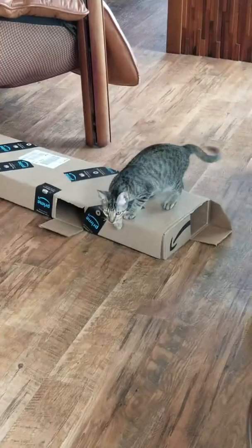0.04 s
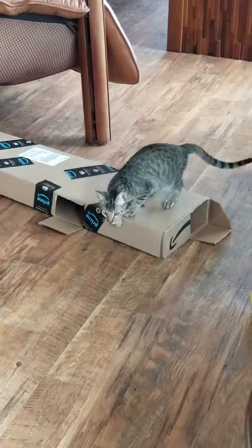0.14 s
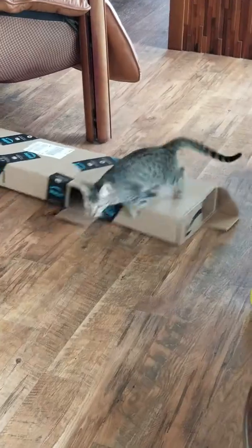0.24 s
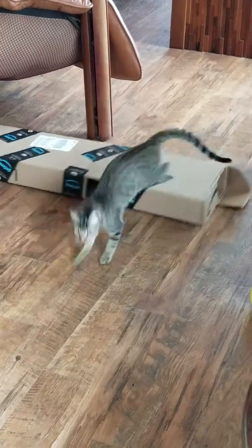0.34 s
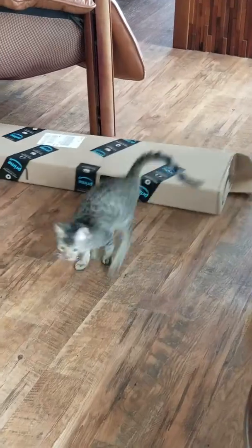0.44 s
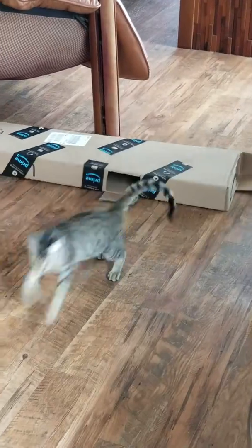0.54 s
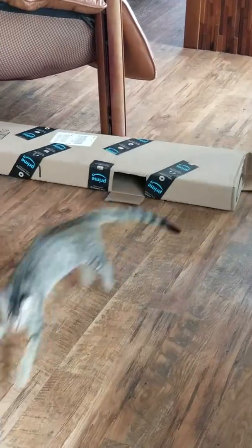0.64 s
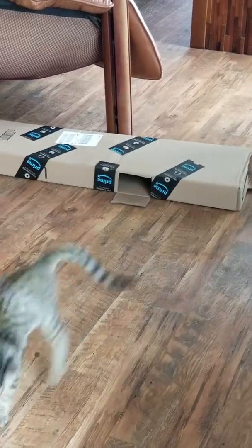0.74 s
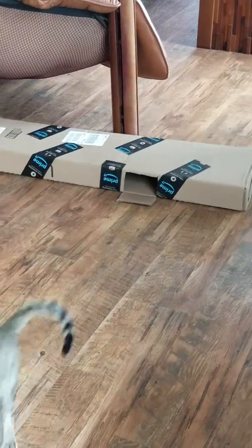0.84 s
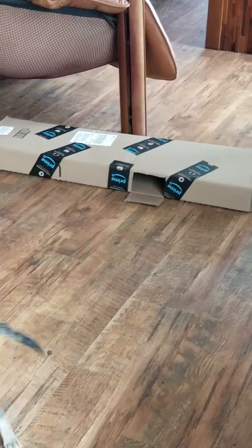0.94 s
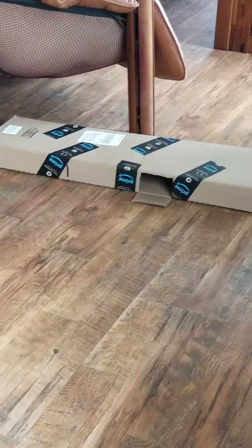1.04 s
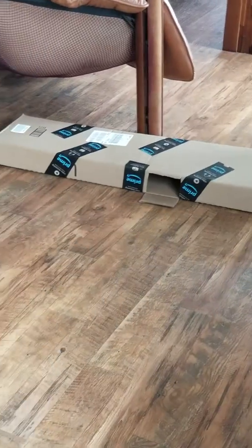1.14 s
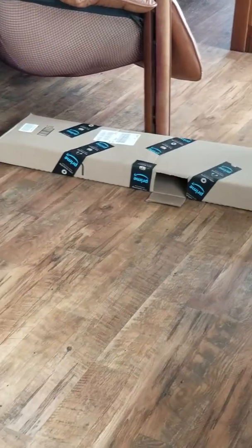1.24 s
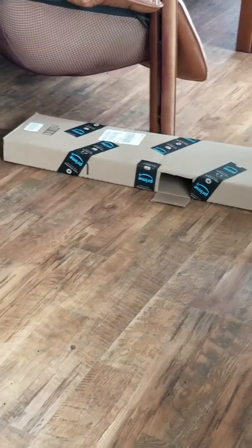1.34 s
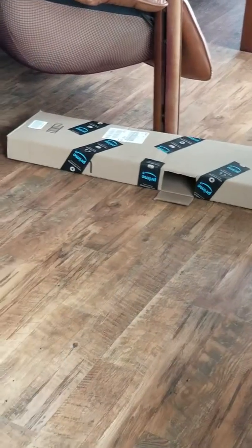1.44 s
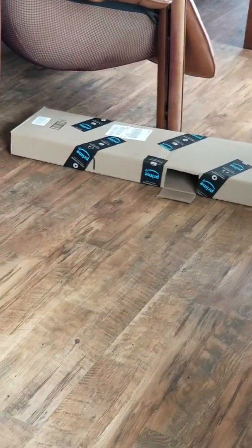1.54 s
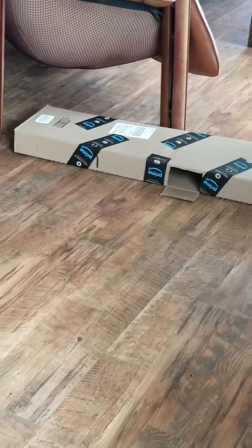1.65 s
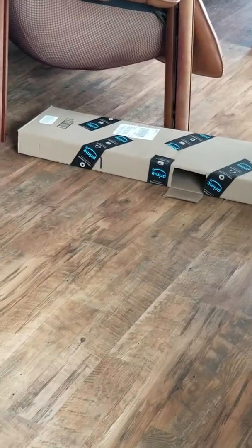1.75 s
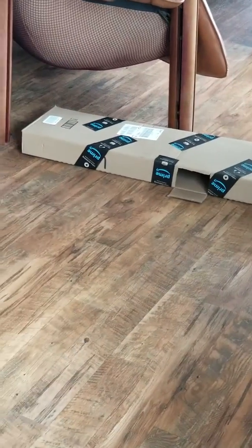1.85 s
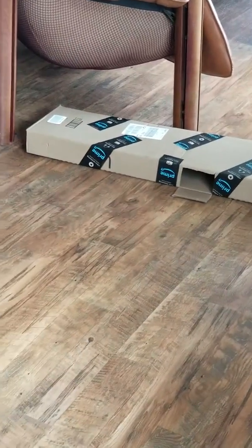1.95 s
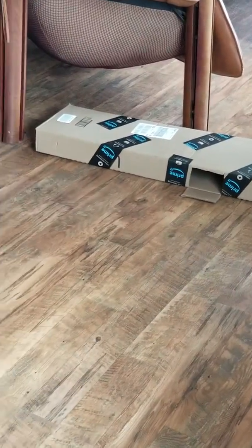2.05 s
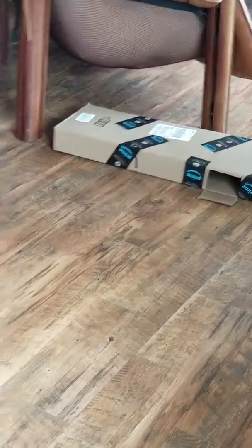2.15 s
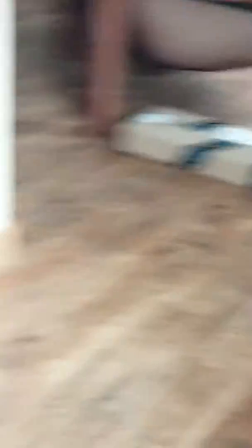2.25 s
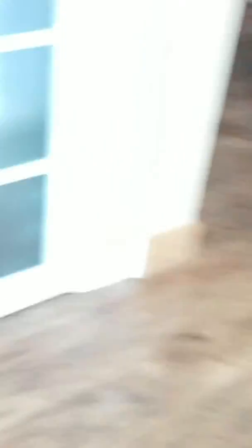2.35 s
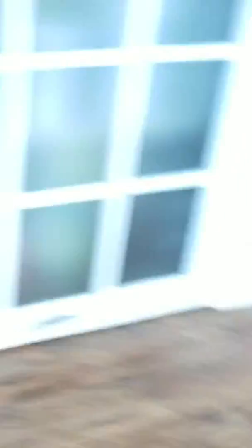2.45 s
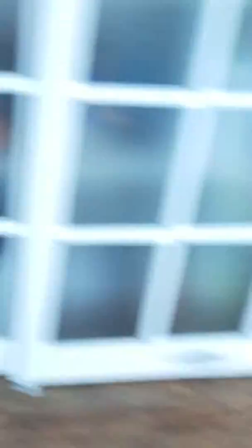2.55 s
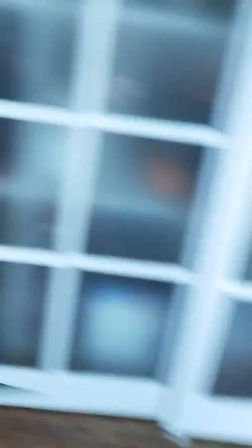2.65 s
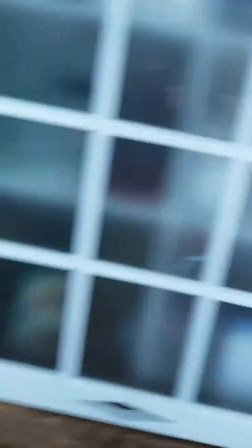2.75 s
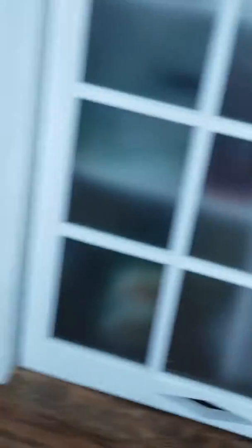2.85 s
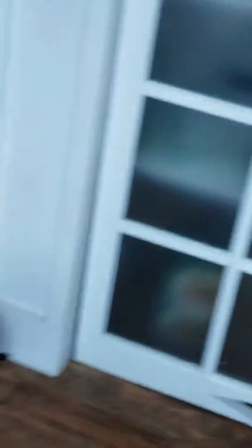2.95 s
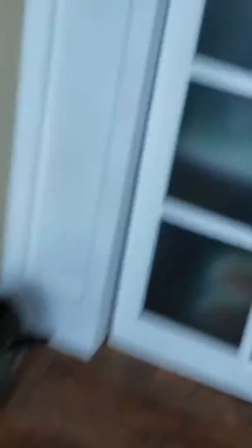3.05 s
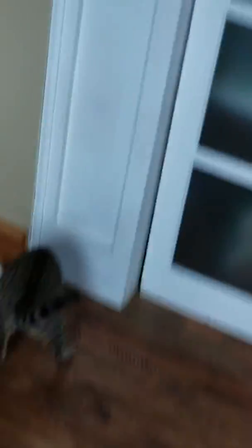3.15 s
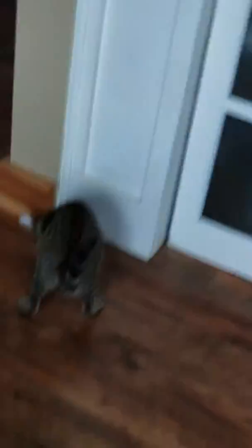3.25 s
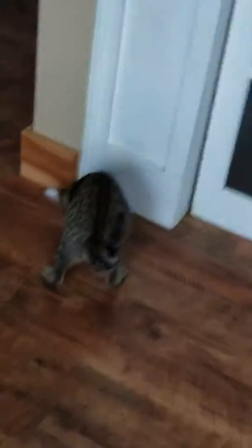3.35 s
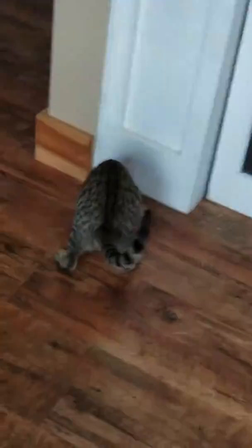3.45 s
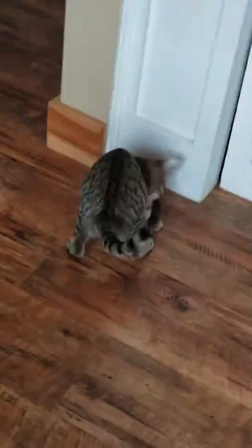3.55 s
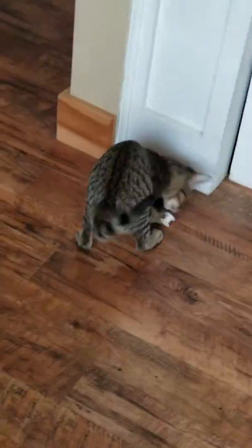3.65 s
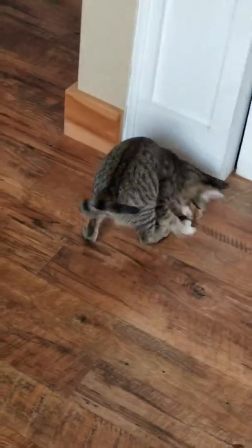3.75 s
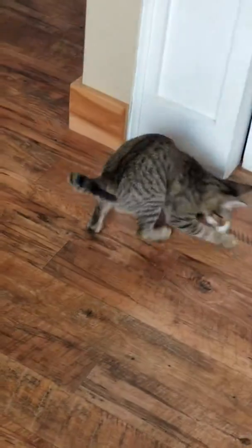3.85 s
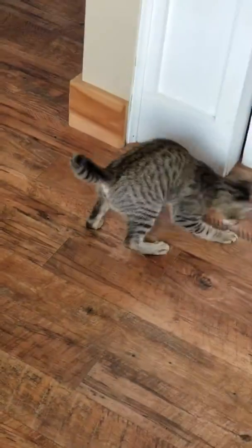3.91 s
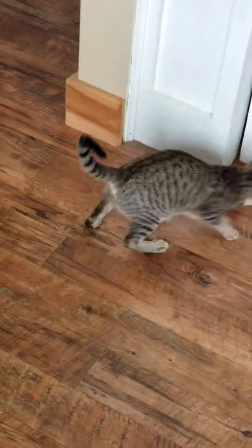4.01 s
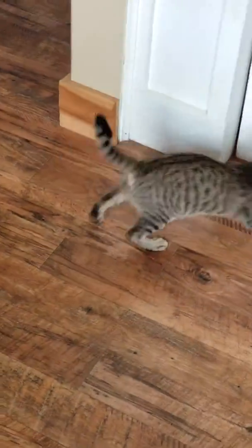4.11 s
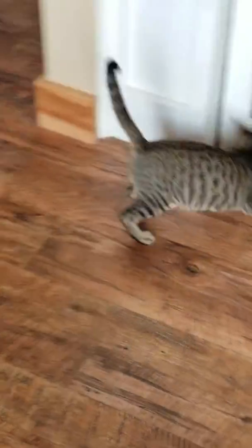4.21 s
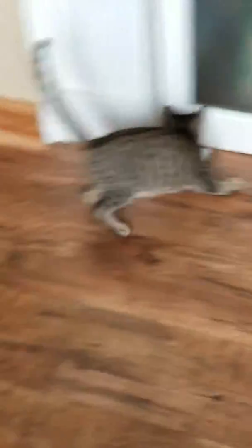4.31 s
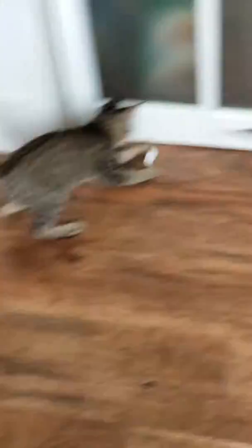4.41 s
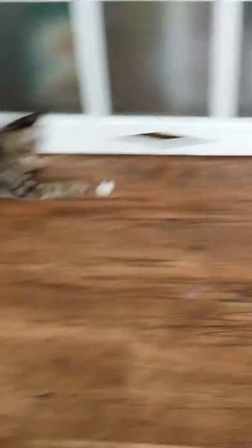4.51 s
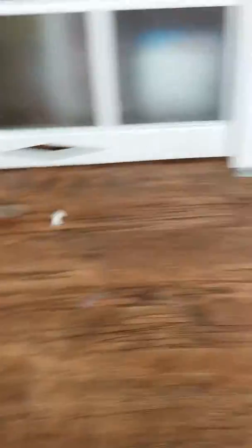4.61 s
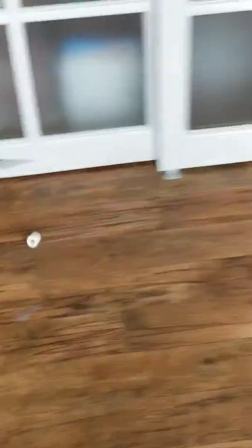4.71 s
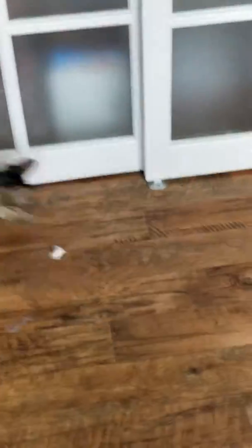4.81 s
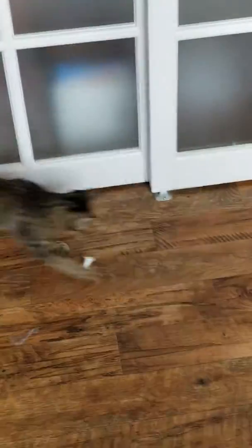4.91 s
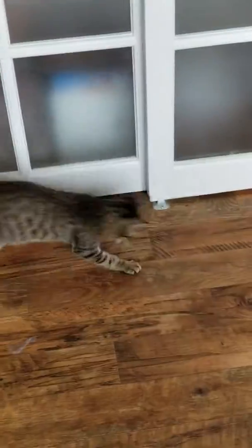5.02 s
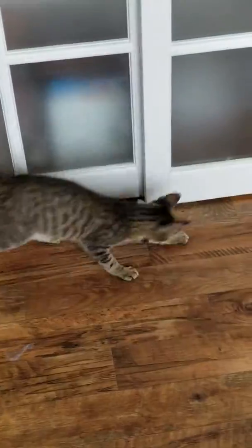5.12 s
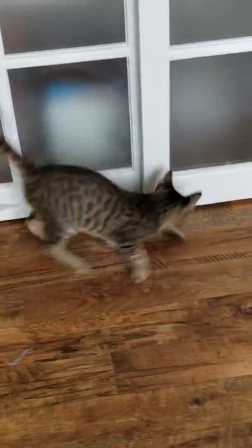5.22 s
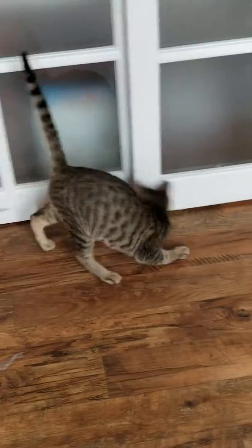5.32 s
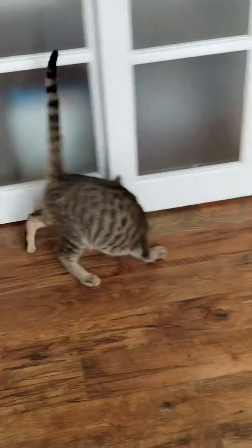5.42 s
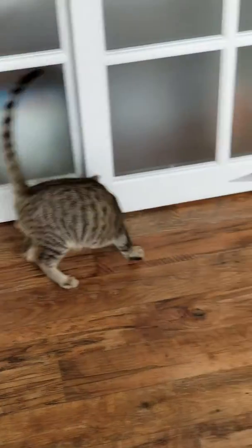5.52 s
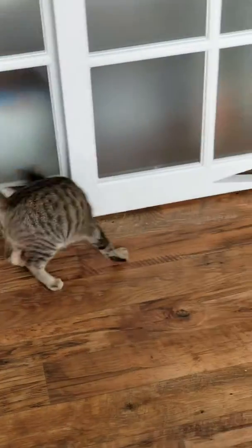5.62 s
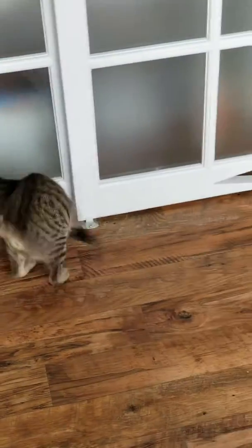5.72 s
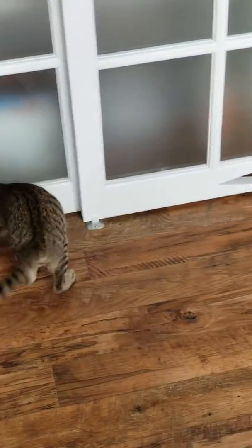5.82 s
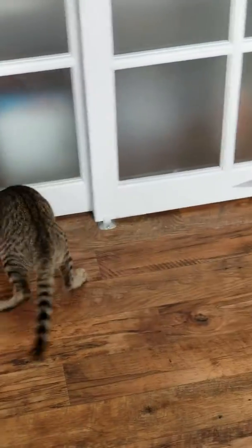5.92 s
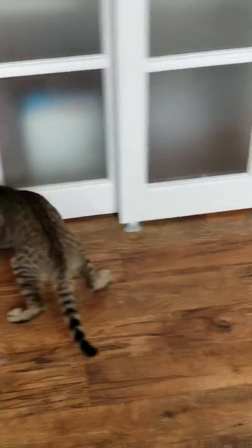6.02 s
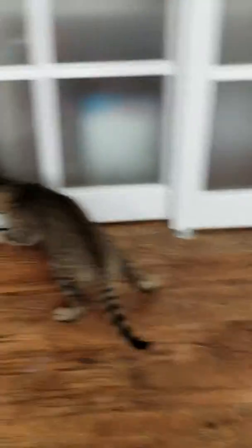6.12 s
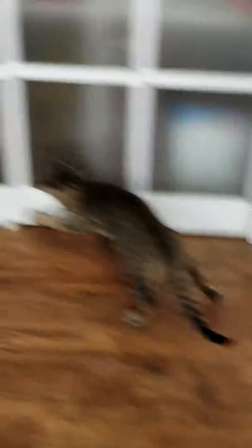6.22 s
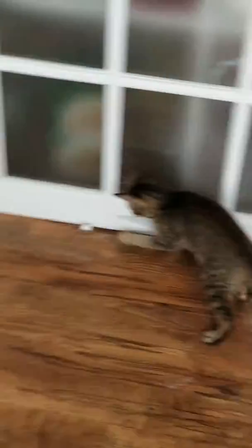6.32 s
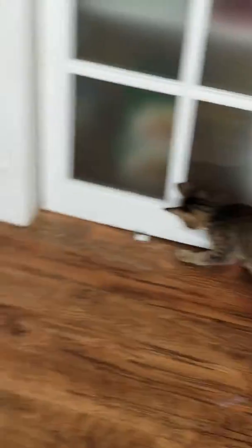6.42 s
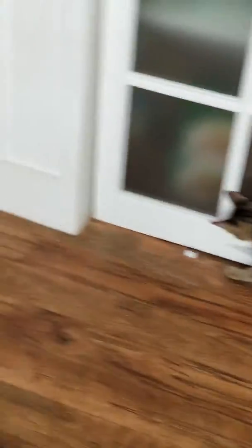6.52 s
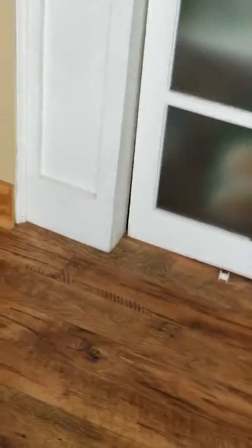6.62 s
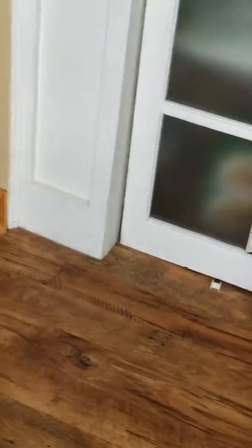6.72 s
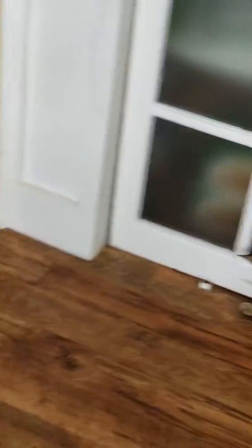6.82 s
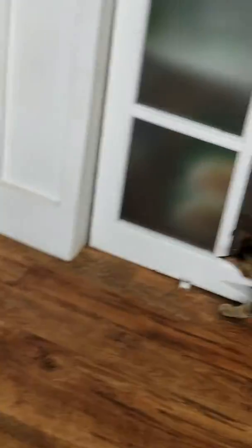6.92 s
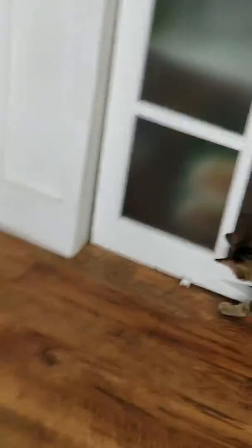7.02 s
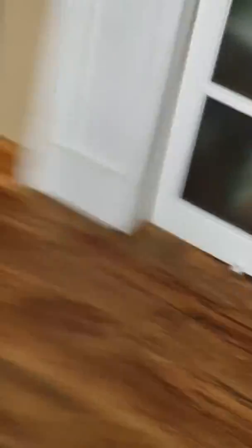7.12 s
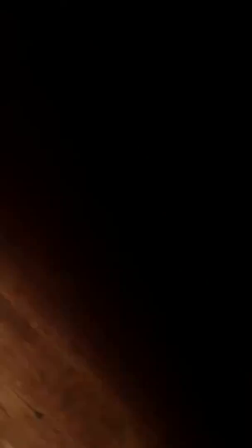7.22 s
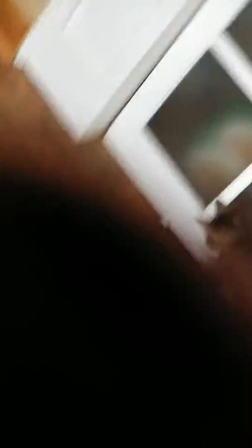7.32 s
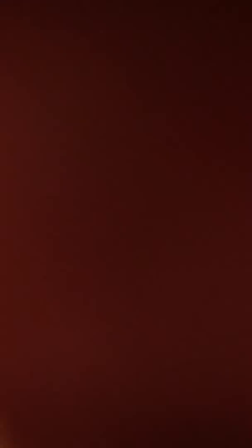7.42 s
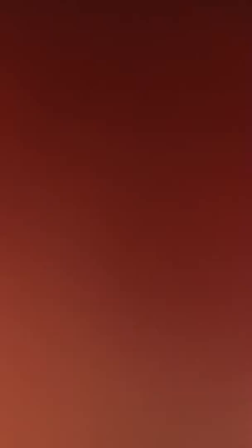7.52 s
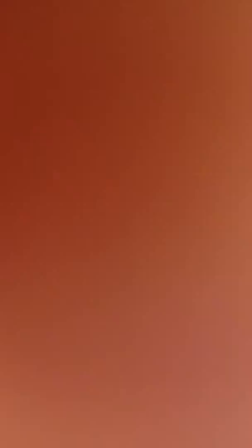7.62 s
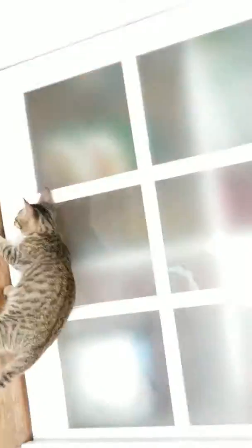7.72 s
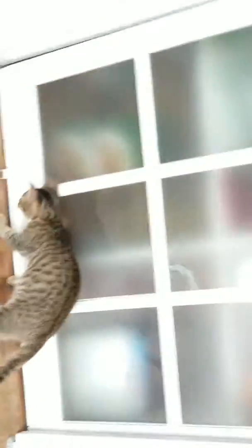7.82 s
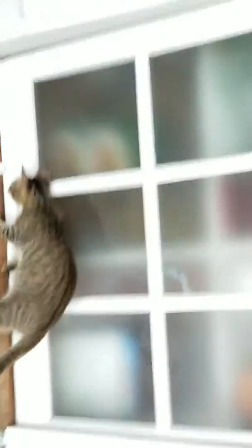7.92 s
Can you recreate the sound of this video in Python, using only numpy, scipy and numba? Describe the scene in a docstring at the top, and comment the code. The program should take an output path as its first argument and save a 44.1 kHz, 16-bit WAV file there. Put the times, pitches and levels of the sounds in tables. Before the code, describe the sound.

A kitten chases a small plastic bell toy across a wooden floor, with clacks, jingles, soft paw thuds and skidding claws.

```python
"""Kitten chasing a bell toy

A bare, live room with a wooden floor, heard from a hand-held stereo microphone. Out in the room a kitten
jumps off a cardboard box and chases a plastic toy: the shell clacks, tumbles and hits a door, a pellet
rings the bell inside, paws thud and claws skid. Close by, clothes rustle as the microphone turns;
at the end a finger taps and rubs the casing beside the left port."""
import sys
import numpy as np
from scipy import signal
from scipy.fft import rfft, irfft, next_fast_len
from scipy.io import wavfile
from scipy.ndimage import uniform_filter1d
from numba import njit

SR = 44100
rng = np.random.default_rng(int(sys.argv[2]) if len(sys.argv) > 2 else 0)


def waveform_to_disk(signal):
    """Save audio, clipped to [-1, 1], as 16-bit WAV at the path in sys.argv[1]."""
    frames = np.transpose(np.atleast_2d(signal))
    scaled = np.clip(frames, -1, 1) * 32767
    samples = np.round(scaled).astype(np.int16)
    wavfile.write(sys.argv[1], SR, samples)


N = 351036
RING, ATTACK = int(.5 * SR), int(.025 * SR)   # samples in a whole blow and in its onset
CATCH = 800   # samples that a sliding surface stays caught
TIME = np.arange(N) / SR
AGE, STROKE_AGE = TIME[:RING], TIME[:RING + RING // 2]

# Levels in the tables are relative; each source sets its own gain.
# toy contacts: (time [s], clack [dB], brightness [dB/octave], tumble [ms], bell [dB], overtones [dB])
TOY_HITS = [(0.86, -46, 5, 8.9, -37.5, -4), (0.89, -25.5, 2.5, 11, -28.5, -3),
            (1.045, -42.5, -2, 27, -36.5, 4), (1.166, -39, 0.5, 14, -40, -1),
            (1.301, -35, -2, 15, -46.5, 6.5), (1.359, -33, 10.5, 28, -36.5, 4),
            (1.424, -38, 2, 8.6, -39, -26), (1.52, -45.5, 4.5, 15, -43.5, -4.5),
            (1.602, -42, -1, 5.3, -46.5, -3.5), (1.649, -52.5, -36, 2.7, -47.5, 0.5),
            (1.814, -44.5, -7, 12, -44.5, 4), (1.959, -45, -8, 6.9, -47, 6),
            (2.111, -59, -13, 21, -57.5, 3.5), (2.251, -52, 4, 10, -44, -16),
            (2.672, -55.5, -2.5, 5.3, -58.5, -17), (3.65, -54, -9.5, 4.2, -52, -19.5),
            (3.668, -49, -3, 7.7, -42.5, -11), (3.711, -43.5, 0.5, 28, -49, -5.5),
            (3.801, -32.5, 2.5, 1.8, -40, -4), (3.846, -40.5, 5, 2, -47, 1),
            (3.898, -56, 28, 6, -34.5, -4.5), (3.941, -25, -3.5, 1.2, -31.5, 2.5),
            (4.115, -41, -32, 0.89, -43.5, -2.5), (4.15, -25.5, 2, 8.4, -28.5, -5.5),
            (4.368, -45, -4, 7.2, -49, -1), (4.403, -45.5, -1, 0.58, -51.5, -5),
            (4.436, -48, -2, 0.87, -45, -6), (4.511, -45.5, -17, 0.23, -51, -3.5),
            (4.59, -38.5, 3.5, 1.1, -40, -4.5), (4.656, -47.5, -8, 2.2, -57.5, 8.5),
            (4.733, -48.5, -4.5, 0.37, -50, -3), (4.79, -48.5, -11, 0.65, -46.5, 1),
            (4.872, -46, -19.5, 0.61, -58, 7.5), (4.939, -30, -0.5, 3, -30.5, -8),
            (5.082, -32, -1.5, 12, -34, -7), (5.203, -39.5, -3, 5.1, -53.5, 5),
            (5.475, -48.5, -26, 87, -40.5, -4.5), (5.657, -43.5, 5.5, 0.4, -36, -12.5),
            (5.766, -39, -2.5, 33, -34.5, -6), (5.805, -25, 4.5, 3.6, -25.5, -2),
            (6.019, -47, -8, 3.5, -49, 0.5), (6.116, -49.5, -11, 0.15, -57.5, 8),
            (6.256, -51.5, 0.5, 0.31, -49, -6), (6.32, -47.5, -5, 2.4, -48.5, -17)]
# spectrum of plastic on boards: (frequency [Hz], level [dB])
CLACK_SPECTRUM = [(200, -11), (600, -3.5), (2000, 4.5), (4300, 1.5), (6000, -3.5), (9500, -9.5),
                  (16000, -36)]
# knock of the shell: (frequency [Hz], level [dB])
SHELL_MODES = [(940, 9), (1500, 6.5), (2200, 8), (3720, 11.5)]
# the bell's lower modes: (frequency [Hz], level [dB])
BELL_MODES = [(7055, 7.5), (7353, 3), (7520, 8), (8344, 5)]
# the bell's overtones: (frequency [Hz], level [dB])
BELL_OVERTONES = [(12190, 11.5), (12400, 0.5), (12590, 2), (14060, 2.5)]
# spectrum of the pellet's own tick: (frequency [Hz], level [dB])
PELLET_SPECTRUM = [(3000, -14.5), (7800, 0), (13800, -0.5), (16000, -10.5)]
# paws landing on box and floor: (time [s], level [dB], centre [Hz])
PAW_THUDS = [(0.282, -35, 73), (0.44, -46, 81), (0.669, -39, 464), (0.819, -41, 206), (1.295, -43, 195),
             (1.58, -43.5, 184), (1.712, -39, 127), (1.874, -36.5, 166), (5.235, -35, 282),
             (5.265, -38.5, 198)]
# floorboard resonances: (frequency [Hz], level [dB])
BOARD_MODES = [(70, -1), (92, -1), (159, 0), (221, -1), (356, -0.5), (470, -1.5)]
# spectrum of a pad slapping the boards: (frequency [Hz], level [dB])
PAD_SPECTRUM = [(150, -9), (600, 3), (2000, -24)]
# claws skid as the kitten brakes or turns: (time [s], length [s], level [dB])
CLAW_SKIDS = [(0.97, 0.31, -48.5), (1.282, 0.08, -37.5), (5.225, 0.024, -33), (5.47, 0.026, -39.5)]
# claws scrabble faintly through each chase: (time [s], length [s], level [dB])
CLAW_SCRABBLES = [(0.8, 1.456, -58.5), (3.66, 0.78, -57), (5.0, 1.256, -52)]
# spectrum of claws on boards: (frequency [Hz], level [dB])
CLAW_SPECTRUM = [(50, -8.5), (190, 6), (5500, -7.5), (16000, -18)]
# spectrum of cardboard sliding on boards: (frequency [Hz], level [dB])
BOX_SPECTRUM = [(50, -32), (150, -12), (330, 4), (480, -7), (1000, -16), (3800, -8), (16000, -11.5)]
# sleeve near the microphone: (time [s], length [s], level [dB], brightness [dB/octave], resonance [Hz])
SLEEVE_BRUSHES = [(2.448, 0.51, -58, -6.5, 616), (2.771, 0.046, -55.5, 1, 754),
                  (6.427, 0.2, -55.5, 2.5, 398), (6.578, 0.17, -50, 4, 370), (6.827, 0.045, -55, -2, 1680),
                  (6.887, 0.041, -55, 2.5, 7250)]
# spectrum of rubbed fabric: (frequency [Hz], level [dB])
CLOTH_SPECTRUM = [(60, -10), (650, -10), (1100, -8.5), (7000, -10.5), (16000, -19)]
# finger sliding on the microphone casing: (time [s], light rub [dB], heavy drag [dB])
FINGER_SLIDE = [(7.054, -46, -44), (7.09, -36.5, -59), (7.13, -29.5, -50), (7.198, -31.5, -41.5),
                (7.285, -36, -40), (7.336, -39, -56), (7.358, -36.5, -68), (7.41, -48, -55),
                (7.42, -36, -37.5), (7.434, -57, -44), (7.51, -62, -44.5), (7.644, -39.5, -47),
                (7.812, -64.5, -44), (7.82, -37.5, -49.5), (7.9, -28, -44), (7.96, -40, -53)]
# spectrum of a light rub of skin: (frequency [Hz], level [dB])
RUB_SPECTRUM = [(1060, -23), (2200, -4.5), (5500, -4), (11500, -6.5), (16000, -12)]
# spectrum of a heavy drag of skin: (frequency [Hz], level [dB])
DRAG_SPECTRUM = [(250, -20), (1200, -1.5), (4000, 1), (8000, -18)]
# taps on the casing: (time [s], ring [dB], click [dB], left over right [dB], ring pitch [Hz])
FINGER_TAPS = [(6.2243, -20, -11.5, 5.5, 2000), (7.0166, -16, -17.5, 17.5, 2970),
               (7.0548, -26, -11.5, 20, 1780)]
# presses on the casing: (time [s], level [dB])
FINGER_PRESSES = [(7.092, -40.5), (7.154, -41), (7.281, -34), (7.884, -43)]
# the room at the microphone: (frequency [Hz], reverberation time [s], left-right likeness [0-1])
ROOM_BANDS = [(150, .65, .92), (320, .65, .82), (700, .6, .35), (5000, .53, .28), (15000, .34, .25)]
# spectrum of the still air of the house: (frequency [Hz], level [dB])
AIR_SPECTRUM = [(25, -9), (130, -10.5), (400, -25), (16000, -36.5)]


def toy(clack_db=-2.5, bell_db=-5.5, pellet_ms=6.8):
    """Out in the room, a little left: edges chatter on wood and the pellet rattles against the bell."""
    touch = signal.unit_impulse(RING)
    out = np.zeros((2, N))
    for s, db, tilt_db, tumble_ms, ring_db, overtones_db in TOY_HITS:
        knock = strike(touch, ringing(SHELL_MODES, cycles=18, spread_db=2, detune=.06))
        knock_db = -12.5 - 0.35 * tilt_db   # a duller blow brings out more of the shell
        clack = attack_one(colour(touch + from_db(knock_db) * knock, CLACK_SPECTRUM, tilt_db))
        pellet = 6 * touch + grains(RING, per_s=2500, spread_db=2) * np.exp(-AGE * 1000 / pellet_ms)
        # the pellet lands on another spot each time, so the modes change in strength
        low, high = [attack_one(strike(pellet, ringing(modes, cycles=340, spread_db=2, detune=.0035)))
                     for modes in (BELL_MODES, BELL_OVERTONES)]
        tick = attack_one(colour(pellet, PELLET_SPECTRUM))
        bell = low + from_db(overtones_db) * (from_db(-3) * high + from_db(1) * tick)
        direct = from_db(db + clack_db) * clack + from_db(ring_db + bell_db) * bell
        crisp_db = 0.5 / (1 + tumble_ms ** 2)   # a single quick touch stands out from its echoes
        heard = in_room(direct, early_db=5.5 - crisp_db, late_db=0.5 - crisp_db, early_t60=0.16,
                        tumble_s=tumble_ms / 1000)
        add(out, s, from_db(crisp_db) * heard)
    return out * from_db([[1.1], [-1.1]])


def paws(thud_db=-3.5, width_octaves=0.66, push_ms=7.5, pad_db=-6.5):
    """A padded blow slaps the floor and stirs the board modes near its own centre frequency."""
    out = np.zeros((2, N))
    # the loudest toy contacts are swipes of a paw, which also thump the boards
    swipes = [(s, db - 15, 414) for s, db, *_ in TOY_HITS if db > -30]
    for s, db, centre_hz in PAW_THUDS + swipes:
        modes = [(hz, gain - 3 * (np.log2(hz / centre_hz) / width_octaves) ** 2)
                 for hz, gain in BOARD_MODES]
        push = rng.standard_normal(RING) * AGE * np.exp(-AGE * 1000 / push_ms)
        boards = attack_one(strike(push, ringing(modes, cycles=28, spread_db=1, detune=0.012)))
        slap = from_db(pad_db) * attack_one(colour(push, PAD_SPECTRUM))
        heard = in_room(boards + slap, early_db=1, late_db=-3, early_t60=0.15)
        onset_rms = np.sqrt(np.mean(heard[:, :2 * ATTACK] ** 2))
        add(out, s, from_db(db + thud_db) * heard / onset_rms)
    return out


def claws():
    """Claws slip over the boards in skids and tick against them during each chase."""
    skidding = strokes(CLAW_SKIDS, attack_s=0.04, sag_db_per_s=65, release_s=0.61)
    slips = friction(CLAW_SPECTRUM, per_s=8300, spread_db=0)
    scrabbling = strokes(CLAW_SCRABBLES, attack_s=0.14, release_s=1)
    ticks = rms_one(colour(grains(N, per_s=260, spread_db=1), CLAW_SPECTRUM))
    ticks = rms_one(in_room(ticks, early_db=8, late_db=2, early_t60=0.1))
    return skidding * slips + scrabbling * ticks


def box_slide(start_s=0.13, db=-21.5):
    """Cardboard scrapes over the floor as the kitten pushes off."""
    out = np.zeros((2, N))
    push = stroke(STROKE_AGE, length_s=0.37, attack_s=0.084, sag_db_per_s=70.5, release_s=0.34, bend=2.2)
    scrape = friction(BOX_SPECTRUM, per_s=20000, spread_db=1, size=len(STROKE_AGE))
    add(out, start_s, from_db(db) * push * scrape)
    return out


def toy_glide(start_s=0.636, db=-53, hiss_hz=5080):
    """The toy slides over the boards with a thin hiss, leading into the first swipe."""
    out = np.zeros((2, N))
    glide = stroke(AGE, length_s=0.59, attack_s=0.084, release_s=0.11)
    hiss = rms_one(resonate(rng.standard_normal((2, RING)), np.full(RING, hiss_hz), q=3.5))
    add(out, start_s, from_db(db) * glide * hiss)
    return out


def clothes(fold_db=3.5, wander_octaves=0.052, catch_db=2.5):
    """Close by, a little right: a sleeve catches and slips, each fold with a wandering resonance."""
    out, size = np.zeros((2, N)), len(STROKE_AGE)
    for s, length_s, db, tilt_db, hz in SLEEVE_BRUSHES:
        fabric = friction(CLOTH_SPECTRUM, per_s=12000, spread_db=3, tilt_db=tilt_db, size=size)
        fold = resonate(fabric, hz * 2 ** (wander_octaves * catches(size, CATCH)), q=3.8)
        rustle = rms_one(fabric + from_db(fold_db) * fold) * from_db(catch_db * catches(size, CATCH))
        brush = stroke(STROKE_AGE, length_s, attack_s=0.011, sag_db_per_s=1, release_s=2 * length_s)
        add(out, s, from_db(db) * rustle * brush)
    return out * from_db([[-1], [1]])


def finger_rub(right_db=-15, rub_hz=3700, hz_per_db=35):
    """Skin rubs in jerks beside the left port; the resonance rises as the rub gets stronger."""
    times, rub_levels, drag_levels = np.transpose(FINGER_SLIDE)
    span, out = TIME[TIME > times[0]], np.zeros((2, N))
    rub_db, drag_db = np.interp(span, times, rub_levels), np.interp(span, times, drag_levels)
    jerks_db = catches(len(span), size=260)
    rub = friction(RUB_SPECTRUM, per_s=17000, spread_db=2, size=len(span))
    wander = 2 ** (0.14 * catches(len(span), CATCH))
    centre_hz = (rub_hz + hz_per_db * (rub_db - rub_levels.mean())) * wander
    rub = rms_one(rub + from_db(-2.5) * resonate(rub, centre_hz, q=3.0))
    drag = friction(DRAG_SPECTRUM, per_s=12000, spread_db=2, size=len(span))
    skin = from_db(rub_db + jerks_db) * rub + from_db(drag_db + 2 * jerks_db) * drag
    add(out, times[0], skin * from_db([[0], [right_db]]))
    return out


def finger_taps(tap_ms=.75):
    """A fingertip clicks on the casing, which rings briefly; so close that there is little room."""
    out, age = np.zeros((2, N)), AGE * 1000 / tap_ms
    for s, ring_db, click_db, left_db, hz in FINGER_TAPS:
        ring = 2 * age * np.exp(1 - 2 * age) * np.sin(2 * np.pi * hz * AGE)
        click = colour(np.exp(-age) * rng.standard_normal(RING), RUB_SPECTRUM)
        tap = from_db(ring_db) * ring + from_db(click_db) * click
        add(out, s, from_db([[0], [-left_db]]) * in_room(tap, early_db=-6, late_db=-20, early_t60=0.03))
    return out


def finger_presses(right_db=-15, press_hz=95, press_ms=6.5):
    """Pressing the casing beside the left port gives a short, low bump."""
    out, age = np.zeros((2, N)), AGE * 1000 / press_ms
    bump = np.sqrt(age) * np.exp(1 - age) * np.sin(2 * np.pi * press_hz * AGE)
    for s, db in FINGER_PRESSES:
        add(out, s, from_db([[db], [db + right_db]]) * bump)
    return out


def room_tone(db=-67.5):
    """The still air of the house: a faint, low hush from all around."""
    air = irfft(diffuse(rng.standard_normal((2, N))), N)
    return from_db(db) * rms_one(colour(air, AIR_SPECTRUM))


def in_room(x, early_db, late_db, early_t60, tumble_s=0):
    """Direct sound, quick reflections, then the tail; a tumble spreads the blow over many touches."""
    noise = diffuse(rng.standard_normal((2, RING)))
    clumps = clatter()
    first_share = 1 / (1 + tumble_s * 1000)   # of the energy, in the first touch
    touches = clumps * np.exp(-2 * AGE / (tumble_s + 1 / SR))
    touches *= (1 - first_share) / touches.sum()
    keep = np.exp(-2 / (tumble_s * SR + 1))   # smears the echoes over the tumble
    early = clumps * signal.lfilter([1 - keep], [1, -keep], from_db(early_db - 60 * AGE / early_t60) ** 2)
    log_hz, log_centres = np.log(freqs(RING) + 1), np.log([row[0] for row in ROOM_BANDS])
    echoes = np.zeros((2, RING))
    for (_, t60, _), this_band in zip(ROOM_BANDS, np.eye(len(ROOM_BANDS))):
        band = irfft(noise * np.interp(log_hz, log_centres, this_band), RING)
        late = signal.lfilter([1 - keep], [1, -keep], from_db(late_db - 60 * AGE / t60) ** 2)
        echoes += band * np.sqrt(touches + (early + late) / ATTACK)
    echoes[:, 0] += np.sqrt(first_share)
    return signal.fftconvolve(x[None], echoes, axes=1)[:, :len(x)]


def diffuse(pair):
    """Spectra at the two ports: unrelated noises mixed to be alike in the bass and less so above."""
    alike = np.clip(at_hz(ROOM_BANDS, freqs(pair.shape[-1]), column=2), 0, .99)
    mid, side = rfft(pair)
    return np.sqrt((1 + alike) / 2) * mid + np.sqrt((1 - alike) / 2) * side * [[1], [-1]]


def clatter(depth_db=4, size=30):
    """Power gain of mean 1: touches and echoes come in uneven clumps."""
    clumps = rms_one(uniform_filter1d(rng.standard_normal(RING), size))
    return rms_one(from_db(depth_db * np.clip(clumps, -2, 2))) ** 2


def ringing(modes, cycles, spread_db, detune):
    """A struck body: modes of random strength and mistuning fall 60 dB in the given cycles."""
    hz, db = np.transpose(modes)[:, :, None]
    strength, shift, flip = rng.standard_normal((3, len(modes), 1))
    turns = hz * (1 + detune * shift) * AGE[:RING // 2]
    decay = from_db(db + spread_db * strength - 60 * turns / cycles)
    return np.sum(np.sign(flip) * decay * np.sin(2 * np.pi * turns), axis=0)


def strike(force, body):
    """A force drives a body whose ring is scaled to unit energy."""
    return signal.fftconvolve(force, body / np.sqrt(np.sum(body ** 2)))[:RING]


def grains(size, per_s, spread_db):
    """Random tiny contacts of uneven size."""
    born = rng.random(size) < per_s / SR
    return born * rng.standard_normal(size) * from_db(spread_db * rng.standard_normal(size))


def friction(spectrum, per_s, spread_db, tilt_db=0, size=N):
    """Dense small slips, coloured by the rubbed surface; stereo, rms 1."""
    slips = irfft(diffuse(grains((2, size), per_s, spread_db)), size)
    return rms_one(colour(slips, spectrum, tilt_db))


def catches(length, size):
    """Smooth random motion of rms 1: a sliding surface catches and lets go."""
    return rms_one(uniform_filter1d(uniform_filter1d(rng.standard_normal(length), size), size))


def stroke(age, length_s, attack_s, release_s, sag_db_per_s=0, bend=1):
    """Envelope of a slide: it gathers speed, sags while it lasts and falls 60 dB over the release."""
    rise = np.clip(age / attack_s, 0, 1) ** bend
    sag_db = sag_db_per_s * np.clip(age, 0, length_s)
    release_db = 60 * np.clip((age - length_s) / release_s, 0, 2)
    return rise * from_db(-sag_db - release_db)


def strokes(rows, **shape):
    """Envelope of a series of like strokes."""
    return sum(from_db(db) * stroke(TIME - s, length_s, **shape) for s, length_s, db in rows)


@njit
def resonate(x, hz, q):
    """Band-pass resonance of peak gain 1, with a centre for every sample."""
    out = np.zeros_like(x)
    for side in range(len(x)):
        band = low = 0.
        for i in range(len(hz)):
            g = np.tan(np.pi * hz[i] / SR)
            now = (band + g * (x[side, i] - low)) / (1 + g * (g + 1 / q))
            band = 2 * now - band
            low += 2 * g * now
            out[side, i] = now / q
    return out


def colour(x, spectrum, tilt_db=0):
    """Minimum-phase filter with a given spectrum, tilted by tilt_db per octave in the mid range."""
    size = 2 * next_fast_len(x.shape[-1] // 2 + 1024)
    hz = freqs(size)
    gain = from_db(at_hz(spectrum, hz) + tilt_db * np.log2(np.clip(hz, 1700, 4500) / 2600))
    cepstrum = irfft(np.log(gain))
    cepstrum[1:size // 2] *= 2
    cepstrum[size // 2 + 1:] = 0
    return irfft(rfft(x, size) * np.exp(rfft(cepstrum)))[..., :x.shape[-1]]


def at_hz(rows, hz, column=1):
    """Read a column of a table on a log-frequency axis."""
    table = np.array(rows)
    return np.interp(np.log(np.maximum(hz, 1)), np.log(table[:, 0]), table[:, column])


def freqs(size):
    """Bin frequencies of a real FFT."""
    return np.arange(size // 2 + 1) * SR / size


def from_db(db):
    """Decibels to gain."""
    return np.exp(np.asarray(db) * np.log(10) / 20)


def rms_one(x):
    """Scale to rms 1."""
    return x / np.sqrt(np.mean(x ** 2) + 1e-20)


def attack_one(x):
    """Scale a blow so that its onset has rms 1."""
    return x / np.sqrt(np.mean(x[..., :ATTACK] ** 2) + 1e-20)


def add(out, s, sound):
    """Mix a sound in at time s."""
    start = round(s * SR)
    out[:, start:start + sound.shape[-1]] += sound[..., :N - start]


def scene():
    """The chase out on the floor and handling noise at the microphone, over the room tone."""
    air = room_tone()
    blows = toy() + paws()
    scuffs = (claws() + box_slide() + toy_glide()) * from_db([[1], [-1]])   # a little left
    handling = clothes() + finger_rub() + finger_taps() + finger_presses()
    return blows + scuffs + handling + air


def record(dry):
    """The top is cut steeply above 16 kHz."""
    return signal.sosfilt(signal.ellip(10, .2, 80, 16000, fs=SR, output="sos"), dry)


dry = scene()
out = record(dry)
waveform_to_disk(out)
```